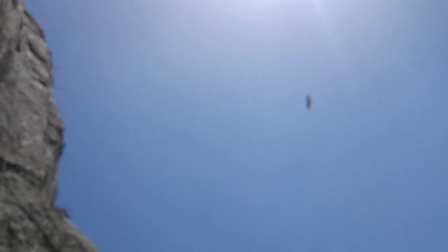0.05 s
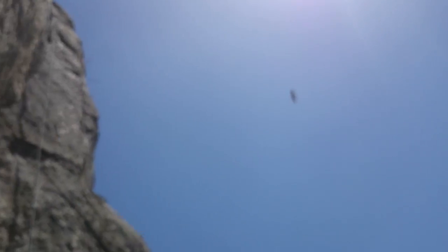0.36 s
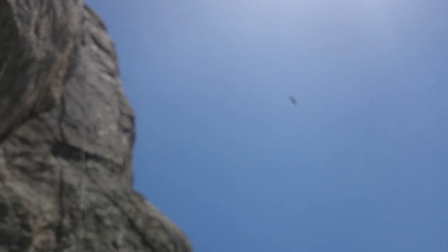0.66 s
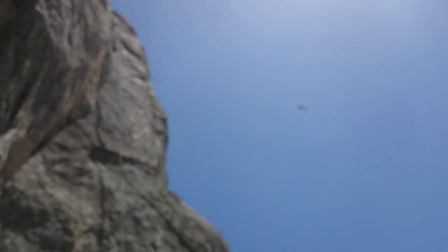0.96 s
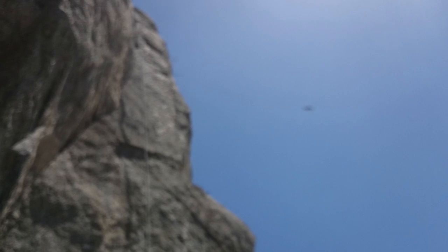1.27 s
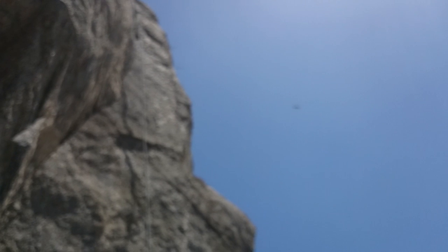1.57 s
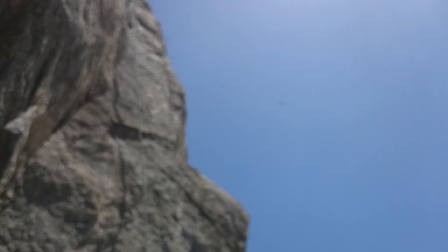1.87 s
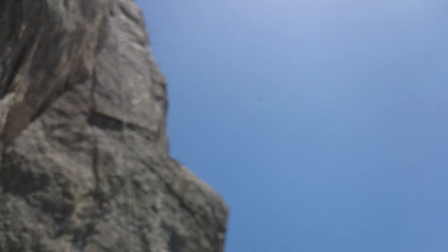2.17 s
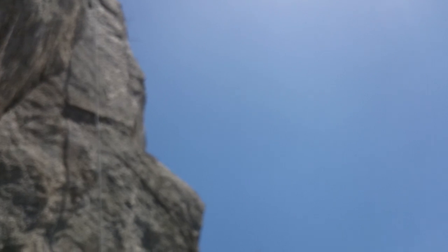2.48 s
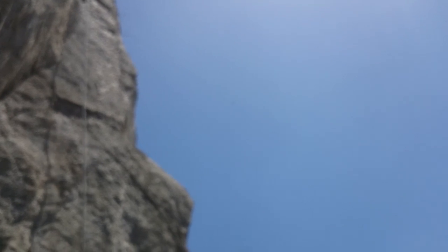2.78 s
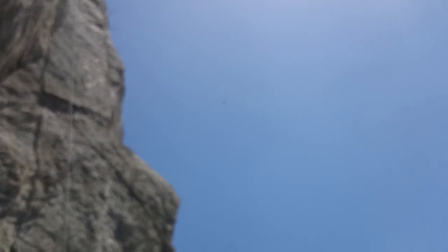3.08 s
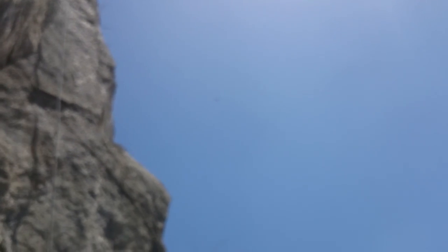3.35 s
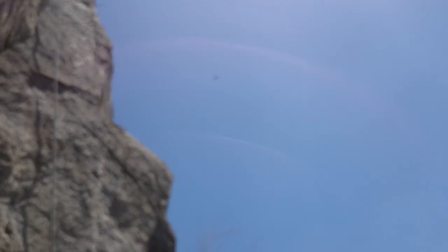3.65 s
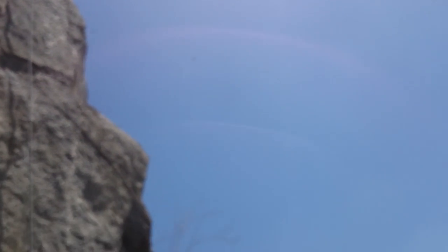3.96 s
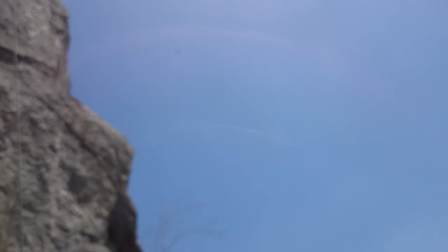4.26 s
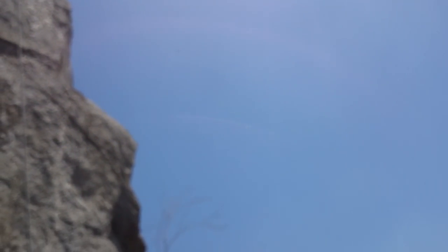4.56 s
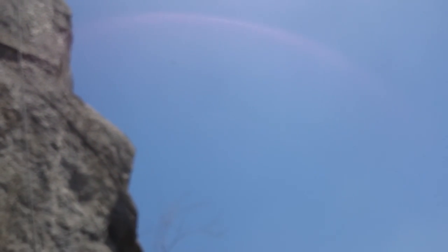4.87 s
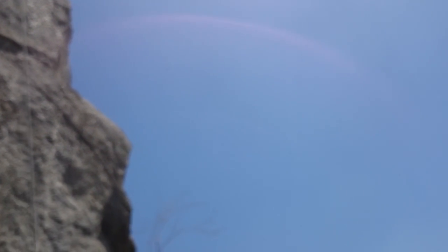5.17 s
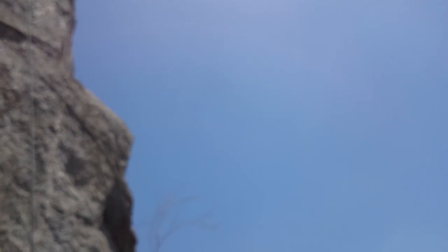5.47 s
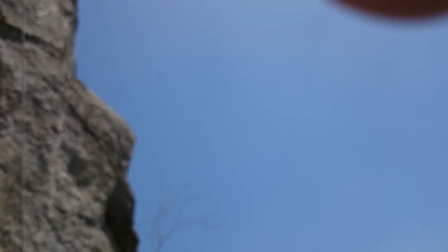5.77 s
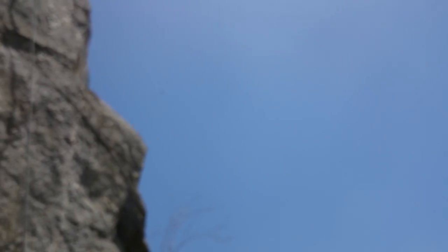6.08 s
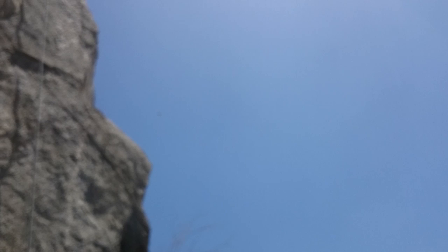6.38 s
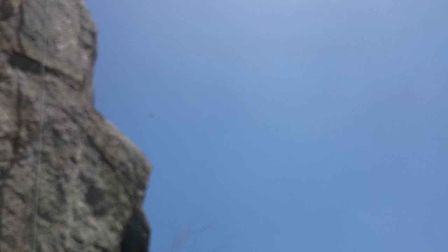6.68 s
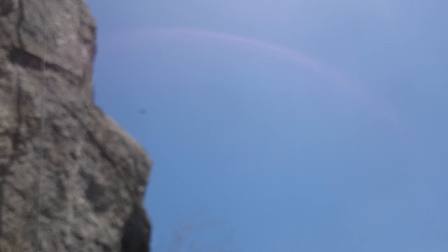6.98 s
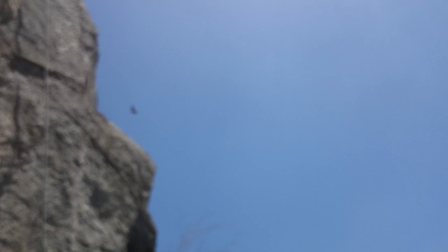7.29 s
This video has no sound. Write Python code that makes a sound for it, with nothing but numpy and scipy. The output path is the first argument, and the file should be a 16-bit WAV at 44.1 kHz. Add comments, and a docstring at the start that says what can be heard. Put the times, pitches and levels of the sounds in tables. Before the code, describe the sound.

Low, uneven wind rumble on the microphone over a faint distant wash, ending with short handling scrapes, ticks and soft bumps.

```python
"""Gusty wind buffets the two microphone ports of a hand-held camera at the foot of a cliff.
Behind it lie the soft roar of distant air, faint engines, far birds and one light tap.
Mostly towards the end, the hand shifts its grip right by the microphones: it rumbles, rubs, drags,
ticks and bumps on the casing, and each port colours the rubs and ticks with its own cavity."""
import sys
import numpy as np
from scipy import signal
from scipy.fft import rfft, irfft, next_fast_len
from scipy.io import wavfile
from scipy.ndimage import uniform_filter1d

SR = 44100
rng = np.random.default_rng(int(sys.argv[2]) if len(sys.argv) > 2 else 0)


def master(y):
    """Save y as 16-bit WAV."""
    cut = np.clip(np.atleast_2d(y).T, -1, 1)
    pcm = np.round(cut * 32767)  # scale
    wavfile.write(sys.argv[1], SR, pcm.astype(np.int16))


N = 328104
TIME = np.arange(N) / SR

# the low rumble passes from wind to the duller sound of the shifting grip: time_s, handling (0-1)
HANDLING = [(5.5, 0.2), (5.9, 0.81)]
# how each port's cavity colours friction on the casing: frequency_hz, relative_db
LEFT_CAVITY = [(300, -26), (1500, -10.5), (2500, -14.5), (3700, -18), (5200, -14.5), (6200, -12.5),
               (7300, -8), (7900, -7.5), (8420, -1), (8900, -6), (10000, -9), (12100, -11.5), (13100, -10),
               (15200, -19)]
RIGHT_CAVITY = [(300, -15), (1500, -14), (2500, -5), (3500, -9.5), (4600, -6), (5600, 3.5), (6400, -1),
                (7300, -9), (9200, -10), (10000, -10.5), (12200, -9), (14000, -11.5), (15200, -19)]


def gain_of(db):
    """Decibels to amplitude."""
    return 10 ** (np.asarray(db) / 20)


def stereo(left_db, right_db):
    """A column of left and right gains."""
    return gain_of([[left_db], [right_db]])


def panned(level_db, pan_db):
    """Gain curves that share a level between the ports; pan_db is left minus right."""
    pair = gain_of(np.array([pan_db, -pan_db]) / 2)
    return gain_of(level_db) * pair / np.sqrt((pair ** 2).mean(0))


def unit_rms(x):
    """Scales each channel to rms 1."""
    return x / np.sqrt(np.mean(x ** 2, -1, keepdims=True) + 1e-20)


def spectrum_at(points, hz):
    """A spectrum table, joined by lines on a log-frequency axis."""
    f, value = np.transpose(points)
    return np.interp(np.log(hz + 1), np.log(f + 1), value)


def cavity_db(hz):
    """The colouring of the left and right ports."""
    return np.array([spectrum_at(LEFT_CAVITY, hz), spectrum_at(RIGHT_CAVITY, hz)])


def curves(rows):
    """The columns of a time table at every sample."""
    times, *columns = np.transpose(rows)
    return [np.interp(TIME, times, column) for column in columns]


def coloured(x, gain):
    """Filters x by gain(hz) and scales it to rms 1."""
    size = next_fast_len(x.shape[-1])
    spectrum = rfft(x, size) * gain(np.fft.rfftfreq(size, 1 / SR))
    return unit_rms(irfft(spectrum, size)[..., :x.shape[-1]])


def noise(n, gain):
    """Independent noise for each port, coloured by gain(hz)."""
    return coloured(rng.standard_normal((2, n)), gain)


def wobble(rate_hz, shape):
    """A smooth random curve of rms 1 that moves up to rate_hz."""
    return coloured(rng.standard_normal(shape), lambda f: 1 / (1 + (f / rate_hz) ** 4))


def steadied(x, span_s):
    """Evens out swells slower than span_s."""
    return x / np.sqrt(abs(uniform_filter1d(x ** 2, int(span_s * SR))) + 1e-6)


def resonate(x, hz, width_hz):
    """A resonance of gain 1 whose centre follows the curve hz."""
    turn = np.exp(2j * np.pi * np.cumsum(hz) / SR)
    pole = np.exp(-np.pi * width_hz / SR)
    return 2 * (turn * signal.lfilter([1 - pole], [1, -pole], x / turn)).real


def add(mix, start_s, sound):
    """Mixes a stereo sound in at start_s."""
    part = mix[:, round(start_s * SR):][:, :sound.shape[1]]
    part += sound[:, :part.shape[1]]


def distant_air(boost_db=8, pan_db=-3, flutter_db=1.22, flutter_hz=7, body_hz=650,
                hollow_hz=880, hollow_octaves=0.56):
    """Wind over far rock and trees: a dull wash, alike in both ports only in the bass."""
    # slow swells: time_s, relative_db, low_body_db, hollow_middle_db
    swells = [(0, -53.5, 0, 2), (1.2, -54.5, -2, 1), (2.1, -54, -1, 0), (3.3, -53, 1, -0.5),
              (4.1, -53.5, -1.5, 2), (4.8, -53, -1, -0.5), (5.4, -52.5, -2, 1.5), (6.1, -51, 1, 2.5),
              (6.6, -53, 0, 0.5), (7.44, -54, -1, 1)]
    # colour of the wash: frequency_hz, relative_db
    colour = [(60, 6), (250, 7), (500, -4), (790, 1.6), (1100, -1.7), (1500, -6.5), (1980, -9.5),
              (2300, -16), (2700, -23), (3600, -27), (5000, -34), (7000, -37.5), (11000, -39), (15000, -59)]
    # likeness of the two ports: frequency_hz, correlation
    likeness = [(100, 1), (500, 0.78), (800, 0.33), (1200, -0.041), (2000, -0.19), (5000, 0.016)]
    # lean across the ports, ahead of the pan: frequency_hz, left_minus_right_db
    balance = [(150, -2.5), (500, 2), (900, -1), (1400, -3.5), (2100, -5.5), (3500, -1.5), (8000, 0)]
    swell_db, body_db, hollow_db = curves(swells)
    hz, frame_s, (common, apart) = signal.stft(rng.standard_normal((2, N)), SR, nperseg=1024)
    hz = hz[:, None]
    same = spectrum_at(likeness, hz)
    left = common * gain_of(spectrum_at(balance, hz))
    right = same * common + np.sqrt(1 - same ** 2) * apart
    flutter = wobble(flutter_hz * SR * frame_s[1], common.shape)  # one value a frame
    patches = unit_rms(uniform_filter1d(flutter, size=12, axis=0))  # nearby bands swell together
    low_db = np.interp(frame_s, TIME, body_db) / (1 + (hz / body_hz) ** 6)
    hollow_band = np.exp(-(np.log2((hz + 1) / hollow_hz) / hollow_octaves) ** 2)
    middle_db = np.interp(frame_s, TIME, hollow_db) * hollow_band
    band_gain = gain_of(spectrum_at(colour, hz) + flutter_db * patches + low_db + middle_db)
    _, air = signal.istft(np.array([left, right]) * band_gain, SR, nperseg=1024)
    return panned(swell_db + boost_db, np.full(N, pan_db)) * unit_rms(air[:, :N])


def far_engines(fade_db=1.5, fade_hz=4, waver=0.00756, swell_s=0.24):
    """Only the low notes of far engines carry; moving air bends them and fades them at each port."""
    # engine notes: start_s, length_s, start_hz, end_hz, level_db
    notes = [(3.2, 0.84, 235, 260.2, -46), (3.7, 0.99, 198.3, 215.3, -47.5), (4.55, 3.4, 158, 158.4, -45.5),
             (5.9, 0.58, 245.7, 254.6, -47)]
    out = np.zeros((2, N))
    for start_s, length_s, start_hz, end_hz, level_db in notes:
        n = int(length_s * SR)
        t = np.arange(n) / SR
        hz = np.linspace(start_hz, end_hz, n) * (1 + waver * wobble(fade_hz, N)[:n])
        swell = np.minimum(np.minimum(t, length_s - t) / swell_s, 1)
        fading = gain_of(level_db - fade_db * wobble(fade_hz, (2, N))[:, :n])
        add(out, start_s, swell * fading * np.sin(2 * np.pi * np.cumsum(hz) / SR))
    return out


def far_birds(waver=0.008, waver_hz=100):
    """Small birds far off: short, faint gliding peeps, blurred by the distance."""
    # peeps: start_s, length_s, start_hz, end_hz, level_db
    peeps = [(3.78, .04, 3700, 3800, -79), (3.86, .04, 3350, 3250, -77), (3.895, .035, 3600, 3480, -78),
             (3.965, .04, 3650, 3500, -78), (4.115, .032, 3350, 3230, -69), (4.12, .03, 4500, 4200, -78),
             (4.44, .05, 3650, 3500, -77), (4.515, 0.045, 3730, 3770, -72), (5.0, .05, 3350, 3280, -80),
             (5.235, .055, 3740, 3800, -76)]
    out = np.zeros((2, N))
    for start_s, length_s, start_hz, end_hz, level_db in peeps:
        n = int(length_s * SR)
        hz = np.linspace(start_hz, end_hz, n) * (1 + waver * wobble(waver_hz, (2, n)))
        peep = np.hanning(n) * np.sin(2 * np.pi * np.cumsum(hz, 1) / SR)
        add(out, start_s, gain_of(level_db) * unit_rms(peep))
    return out


def cliff_tap(start_s=1.311, left_db=-47.5, right_db=-39.5, rise_s=0.00058, knock_db=3,
              knock_t60_s=0.011, scatter_db=-21.5, scatter_t60_s=0.31, scatter_hz=3600):
    """A light, hard tap some way off to the right, like a pebble on rock; the cliff scatters it back."""
    # ring of the tap: pitch_hz, relative_db, t60_s
    modes = [(1160, 3, 0.012), (1650, -1, 0.008), (2250, -1.5, 0.03), (2830, -7, 0.008), (3400, -1, 0.009),
             (4080, -7.5, 0.031), (4450, -6, .009), (5350, -3, 0.0062)]
    out, t = np.zeros((2, N)), np.arange(SR // 4) / SR
    ring = sum(gain_of(db - 60 * t / t60_s) * np.sin(2 * np.pi * (hz * t + rng.random()))
               for hz, db, t60_s in modes)
    knock = noise(len(t), lambda f: 1 / (1 + (f / 4400) ** 6))
    knock *= gain_of(knock_db - 60 * t / knock_t60_s)
    scatter = noise(len(t), lambda f: 1 / (1 + ((f - scatter_hz) / 900) ** 2))
    scatter *= gain_of(scatter_db - 60 * t / scatter_t60_s)
    attack = 1 - np.exp(-t / rise_s)
    add(out, start_s, stereo(left_db, right_db) * attack * (ring + knock + scatter))
    return out


def palm_drags(far_side_db=-16, low_hz=170, body_hz=330, judder_db=3, judder_hz=45):
    """The heel of the hand drags on the right side of the camera: a dull, juddering rumble."""
    # drags: start_s, length_s, right_db
    drags = [(5.968, .4, -40.5), (7.044, 0.032, -39)]
    out = np.zeros((2, N))
    for start_s, length_s, right_db in drags:
        n = int(length_s * SR)
        slips = rng.standard_normal((2, n)) * gain_of(judder_db * wobble(judder_hz, n))
        rumble = coloured(slips, lambda f: f ** 2 / (f ** 2 + low_hz ** 2) / (1 + (f / body_hz) ** 3))
        swell = np.sin(np.linspace(0, np.pi, n))
        add(out, start_s, stereo(right_db + far_side_db, right_db) * swell * rumble)
    return out


def stroke_speed(t, length_s, rise, fullness=0.73, squareness=2.53, brush_db=-23, brush_s=0.019):
    """A finger gathers and loses speed smoothly, then still brushes lightly as it lifts."""
    progress = t / length_s
    from_peak = np.maximum((rise - progress) / rise, (progress - rise) / (1 - rise))
    stroke = np.sqrt(2) * np.exp(-(from_peak / fullness) ** squareness)
    lift = np.exp(-np.maximum(t - length_s, 0) / brush_s)
    return stroke + gain_of(brush_db) * np.interp(progress, [0, rise, 1], [0, .5, 1]) * lift


def finger_rubs(grain_db=2, grain_hz=1100, drag_db=1.2, drag_hz=110, rasp_hz=3500, top_hz=10000,
                pocket_db=3, wander=0.06, wander_hz=30, body_hz=380):
    """Tiny slips of skin excite the port cavities, the air pocket under the fingertip and the body."""
    # strokes on the casing: start_s, length_s, rise_share, left_db, right_db, rasp_db, top_db, pocket_hz
    strokes = [(0, 0.016, 0.15, -44, -49.5, 5, 1, 7660), (0.56, 0.12, 0.38, -74, -73, 8, -3, 3800),
               (4.622, 0.06, .5, -70, -77.5, -4, 1, 8500), (5.202, 0.035, .4, -82, -75, -4, -8, 5800),
               (5.34, 0.21, 0.55, -90, -79, -6, -6, 5800), (5.697, 0.058, 0.1, -41, -51.5, -2.5, -8, 7400),
               (5.735, 0.059, 0.42, -45, -50, 3.5, -3, 5000), (5.793, 0.076, 0.34, -53.5, -63, 8, -1, 4900),
               (5.897, 0.045, 0.44, -48.5, -60.5, -1, -3, 7300),
               (6.011, 0.14, 0.52, -65, -63.5, -8, -1, 4800),
               (6.115, 0.11, 0.58, -51.5, -47.5, 6, -1, 4600),
               (6.208, 0.12, 0.16, -67.5, -64.5, 0, -3, 8300),
               (6.307, 0.053, 0.48, -47.5, -47.5, 6, -2, 5500), (6.409, 0.1, 0.94, -69, -67, 2, -7, 4600),
               (6.497, 0.072, 0.69, -42, -49.5, -3.5, -1, 2730), (6.595, 0.099, 0.55, -63, -60, 8, 3, 5400),
               (6.89, 0.053, 0.24, -64.5, -66, 2, 0, 7600), (6.968, 0.012, 0.6, -38.5, -50, -14, -10, 8450),
               (6.977, 0.015, 0.37, -34.5, -43.5, -10, -8, 7260),
               (6.985, 0.016, .5, -42, -53, -2, -7, 8500), (6.999, 0.037, 0.44, -62, -62.5, 21, -2, 2600),
               (7.023, 0.041, 0.3, -36, -46, -4.5, -2, 2380), (7.099, 0.11, 0.33, -55, -60, 4, 1.5, 4550),
               (7.204, 0.082, 0.55, -51, -49.5, -2, 3.5, 4930), (7.27, 0.081, 0.18, -72, -69, 1, 0, 5700),
               (7.342, 0.088, 0.4, -63.5, -60.5, 10, 2, 5000)]
    out = np.zeros((2, N))
    for start_s, length_s, rise, left_db, right_db, rasp_db, top_db, pocket_hz in strokes:
        lead_s = min(start_s, .04)
        t = np.arange(-lead_s, length_s + .08, 1 / SR)
        n = len(t)
        slips = rng.standard_normal((2, n))
        slips *= gain_of(grain_db * wobble(grain_hz, n) + drag_db * wobble(drag_hz, n))
        hiss = coloured(slips, lambda f: gain_of(
            cavity_db(f) + rasp_db / (1 + (f / rasp_hz) ** 4) - top_db / (1 + (f / top_hz) ** 20)))
        pocket = resonate(hiss, pocket_hz * (1 + wander * wobble(wander_hz, n)), width_hz=380)
        level = stereo(left_db, right_db)
        nearness = level / level.max()  # the pocket sounds most in the touched port
        friction = level * unit_rms(hiss + nearness * gain_of(pocket_db) * pocket)
        body = coloured(slips, lambda f: f / (f + body_hz / 2) / (1 + (f / body_hz) ** 3))
        body *= stereo(-14, -2) * gain_of(right_db + rasp_db)  # a rasping stroke shakes it more
        add(out, start_s - lead_s, stroke_speed(t, length_s, rise) * (friction + body))
    return out


def casing_ticks(left_hz=8450, right_hz=5700, crack_db=2, crack_t60_s=0.0064, colour_share=0.35,
                 low_cut_hz=5200):
    """The casing snaps under the grip: a tiny crack, and each port's cavity rings at its own pitch."""
    # snaps, ahead of the low cut: start_s, left_db, right_db, ring_t60_s, crack_share
    snaps = [(0.522, -47, -47, 0.0014, 0.84), (1.1201, -41, -45, 0.0015, 0.67),
             (5.6977, -35, -39, .003, .7), (5.7085, -31, -38, .002, .6), (6.4922, -23, -16.5, 0.0055, 0.17),
             (6.6270, -30.5, -38, 0.0022, 0.67), (6.9752, -23, -42, 0.0073, 0.17)]
    out, t = np.zeros((2, N)), np.arange(SR // 50) / SR
    for start_s, left_db, right_db, t60_s, crack_share in snaps:
        ring = np.sin(2 * np.pi * np.array([[left_hz], [right_hz]]) * t) * gain_of(-60 * t / t60_s)
        crack = noise(len(t), lambda f: gain_of(colour_share * cavity_db(f)))
        crack *= crack_share * gain_of(crack_db - 60 * t / crack_t60_s)
        add(out, start_s, stereo(left_db, right_db) * (ring + crack))
    return signal.sosfilt(signal.butter(2, low_cut_hz, "high", fs=SR, output="sos"), out)


def finger_bumps(rise_s=0.0017, scuff_db=-15, scuff_hz=520, scuff_t60_s=0.03):
    """A fingertip's soft push gives a short low ring in the nearer port and a dull scuff as it lands."""
    # pushes: start_s, pitch_hz, t60_s, left_db, right_db
    pushes = [(5.703, 470, 0.061, -54, -29.5), (6.503, 424, 0.027, -50, -16),
              (6.974, 465, 0.031, -44, -26.5)]
    out, t = np.zeros((2, N)), np.arange(SR // 5) / SR
    attack = 1 - np.exp(-t / rise_s)
    for start_s, pitch_hz, t60_s, left_db, right_db in pushes:
        ring = np.sin(2 * np.pi * pitch_hz * t) * gain_of(-60 * t / t60_s)
        scuff = noise(len(t), lambda f: 1 / (1 + (f / scuff_hz) ** 4))
        scuff *= gain_of(scuff_db - 60 * t / scuff_t60_s)
        add(out, start_s, stereo(left_db, right_db) * attack * (ring + scuff))
    return out


def pressure_sway(boost_db=2.5, pan_db=-11, handling_pan_db=-12, low_hz=3, top_hz=11):
    """Slow, deep pressure swings, mostly on the right: first from wind, later from the shifting hand."""
    # strength of the swings: time_s, relative_db
    swings = [(0, -26), (1.2, -24.5), (1.45, -31.5), (1.8, -26.5), (3.25, -26), (3.6, -32.5), (5.35, -36),
              (6.0, -24.5), (6.55, -17.5), (6.8, -35.5), (7.04, -17.5), (7.44, -37.5)]
    swing_db, handling = curves(swings)[0], curves(HANDLING)[0]
    push = noise(N, lambda f: f ** 2 / (f ** 2 + low_hz ** 2) / (1 + (f / top_hz) ** 3))
    return panned(swing_db + boost_db, pan_db + handling_pan_db * handling) * steadied(push, span_s=0.44)


def wind_puffs(half_width_cycles=0.66, turbulence_db=-19, turbulence_hz=400, lead_s=0.04):
    """A single hard eddy slaps a port: one round swing of pressure with a little turbulence inside."""
    # hard eddies: peak_s, pitch_hz, left_db, right_db
    puffs = [(.507, 160, -18.5, -26), (0.608, 122, -30, -16), (0.628, 159, -15.5, -20),
             (.674, 133, -32, -10), (0.933, 128, -26, -34), (1.173, 124, -36, -21), (1.25, 114, -38, -16),
             (1.412, 125, -18.5, -31), (1.548, 112, -14, -38), (1.783, 149, -23, -15.5),
             (1.918, 155, -14, -15), (2.002, 124, -12.5, -28), (2.102, 118, -24, -11),
             (2.549, 112, -11.5, -25), (2.647, 117, -15.5, -34), (2.73, 146, -14.5, -14),
             (2.772, 119, -24, -13), (2.942, 116, -9.5, -30), (2.987, 100, -11.5, -24),
             (3.069, 167, -23.5, -12), (3.3, 114, -17.5, -14), (3.791, 205, -21, -14.5),
             (3.927, 116, -36, -17)]
    out, t = np.zeros((2, N)), np.arange(-lead_s, lead_s, 1 / SR)
    for peak_s, pitch_hz, left_db, right_db in puffs:
        swing = np.cos(2 * np.pi * (pitch_hz * t + rng.random((2, 1))))
        turbulence = gain_of(turbulence_db) * noise(len(t), lambda f: 1 / (1 + (f / turbulence_hz) ** 4))
        swell = np.exp(-(pitch_hz * t / half_width_cycles) ** 2)
        add(out, peak_s - lead_s, stereo(left_db, right_db) * swell * (swing + turbulence))
    return out


def buffet_force(rise=0.49, squareness=2.27):
    """Force at each port: the breeze, with every buffet of wind or hand swelling and dying on top."""
    # steady breeze, in relative levels: time_s, left_db, right_db
    breeze = [(0, -30, -33.5), (.6, -45.5, -28), (.85, -34, -30.5), (1.3, -36, -36.5), (2.05, -30.5, -30),
              (2.32, -43, -44.5), (2.7, -33.5, -29.5), (3.2, -30.5, -30), (3.42, -33, -42),
              (3.65, -38, -31), (4.3, -33.5, -40), (4.85, -49, -46.5), (5.2, -39, -40), (6.25, -45.5, -39),
              (6.7, -49, -39.5), (7.44, -40, -40)]
    # gusts and, near the end, shifts of grip, in relative levels: peak_s, length_s, left_db, right_db
    buffets = [(0.466, 0.13, -27, -25), (0.604, 0.074, -25, -22.5), (0.684, 0.046, -23.5, -17.5),
               (1.176, 0.023, -47, -22.5), (1.277, 0.044, -28, -24.5), (1.434, 0.085, -27.5, -25.5),
               (1.549, 0.046, -27.5, -40), (1.796, 0.079, -24, -32), (1.888, 0.062, -24.5, -22),
               (1.987, 0.026, -19, -39), (2.087, 0.05, -21.5, -27), (2.17, 0.054, -32.5, -27.5),
               (2.46, 0.05, -47, -26.5), (2.526, 0.055, -23, -21), (2.716, 0.11, -26, -26.5),
               (2.984, 0.058, -16, -21), (3.084, 0.049, -17, -19.5), (3.176, 0.06, -26.5, -23.5),
               (3.245, 0.067, -19.5, -41), (3.29, 0.025, -24.5, -31), (3.792, 0.05, -29, -25.5),
               (3.918, 0.034, -47, -34), (4.508, 0.05, -39, -33.5), (4.626, 0.036, -39, -34),
               (5.183, 0.037, -36, -42), (5.685, 0.033, -30, -36), (6.117, 0.045, -34, -35),
               (6.244, 0.085, -35, -28), (6.321, 0.025, -37, -23.5), (6.537, 0.03, -49, -30),
               (6.737, .025, -43, -30.5), (6.849, 0.016, -30, -45), (6.898, 0.025, -42, -29),
               (6.999, 0.033, -47, -18), (7.058, 0.049, -50, -28.5), (7.182, 0.057, -38, -29),
               (7.28, 0.047, -33, -49), (7.369, 0.024, -48, -20)]
    power = gain_of(curves(breeze)) ** 2
    for peak_s, length_s, left_db, right_db in buffets:
        from_peak = np.maximum((peak_s - TIME) / rise, (TIME - peak_s) / (1 - rise)) / length_s
        near = from_peak < 3
        power[:, near] += stereo(left_db, right_db) ** 2 * np.exp(-from_peak[near] ** squareness)
    return np.sqrt(power)


def buffeting(boost_db=2.36, calm_db=-38, gale_db=-19, lump_db=4, lump_hz=35, steady_s=0.07,
              flutter_db=1.5, flutter_hz=10):
    """Low buffets on the ports: wind gusts and, near the end, duller rumbles from the shifting grip."""
    # colours of light and of strong buffeting: frequency_hz, relative_db
    light_colour = [(8, -10.5), (25, 3.5), (60, 3), (130, -3.5), (200, -12.5), (300, -25.5), (450, -40.5),
                    (900, -48.5), (2500, -66.5), (9000, -70.5), (14000, -83)]
    strong_colour = [(8, -24), (30, 10), (60, -0.5), (140, -1), (210, -7.5), (320, -13.5), (500, -27),
                     (900, -49), (2500, -65.5), (9000, -88), (14000, -94.5)]
    flutter = gain_of(flutter_db * wobble(flutter_hz, (2, N)))
    lumps = steadied(gain_of(lump_db * wobble(lump_hz, (2, N))), steady_s)
    force = buffet_force() * flutter * lumps
    # a harder lump of wind holds smaller, brighter eddies; handling stays dull
    strong_share = np.clip((20 * np.log10(force) - calm_db) / (gale_db - calm_db), 0, 1)
    strong_share *= 1 - curves(HANDLING)[0]
    pressure = rng.standard_normal((2, N))
    pressure = pressure + .06 * pressure[::-1]  # a little reaches the other port
    light = coloured(pressure, lambda f: gain_of(spectrum_at(light_colour, f)))
    strong = coloured(pressure, lambda f: gain_of(spectrum_at(strong_colour, f)))
    rumble = steadied((1 - strong_share) * light + strong_share * strong, steady_s)
    return gain_of(boost_db) * force * rumble


def scene():
    """Wind on the microphones, the far surroundings, and the hand on the camera."""
    rumble = buffeting() + pressure_sway() + wind_puffs()
    far = distant_air() + far_engines() + far_birds() + cliff_tap()
    hand = finger_rubs() + palm_drags() + casing_ticks() + finger_bumps()
    return rumble + far + hand


def record(dry):
    """The camera cuts off the top treble steeply."""
    edge_hz = 15250
    lowpass = signal.firwin(401, edge_hz, window=("kaiser", 8), fs=SR)
    padded = np.pad(dry, [(0, 0), (200, 200)], "edge")
    return signal.oaconvolve(padded, lowpass[None], "valid")


dry = scene()
out = record(dry)
master(out)
```